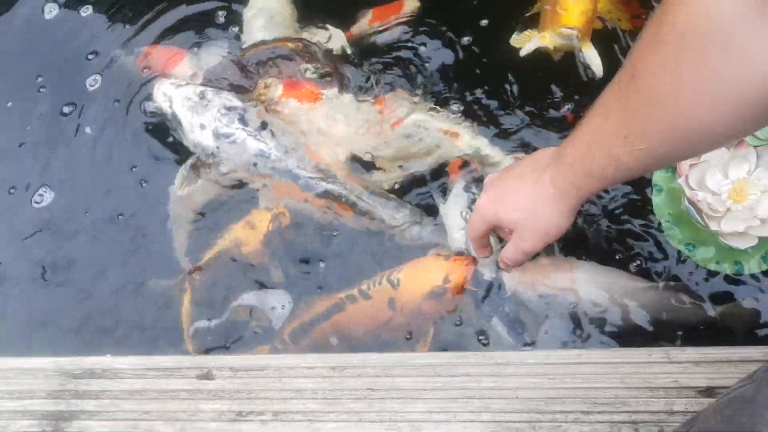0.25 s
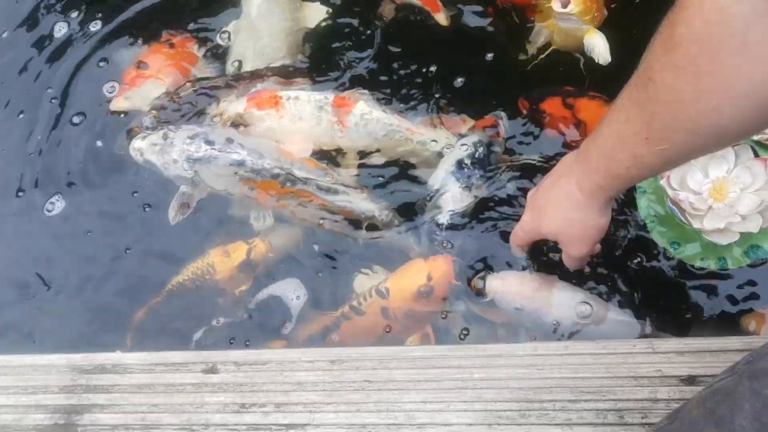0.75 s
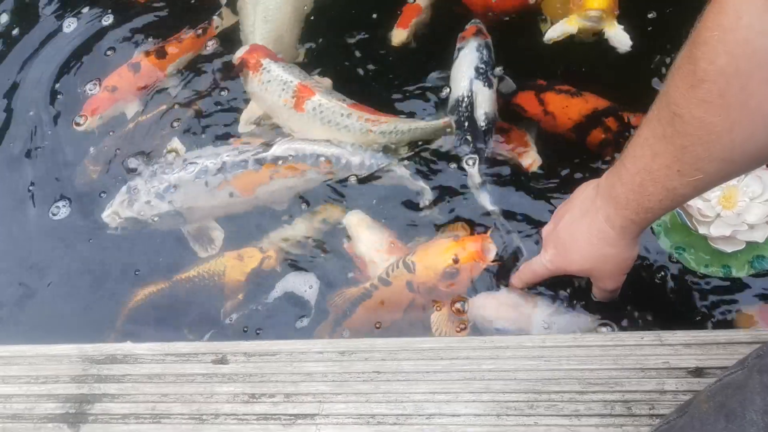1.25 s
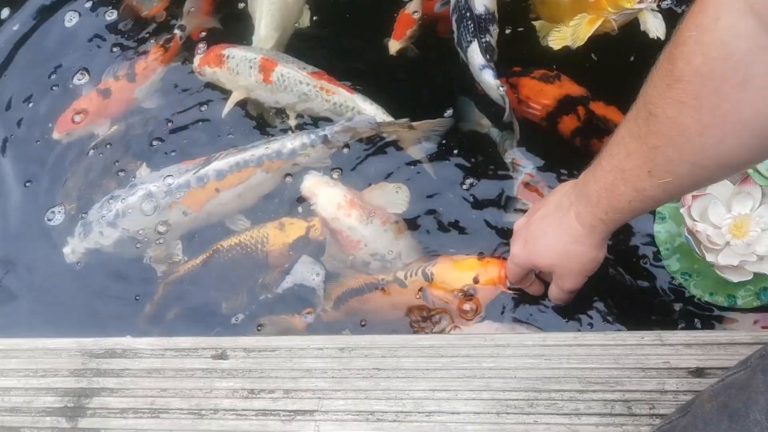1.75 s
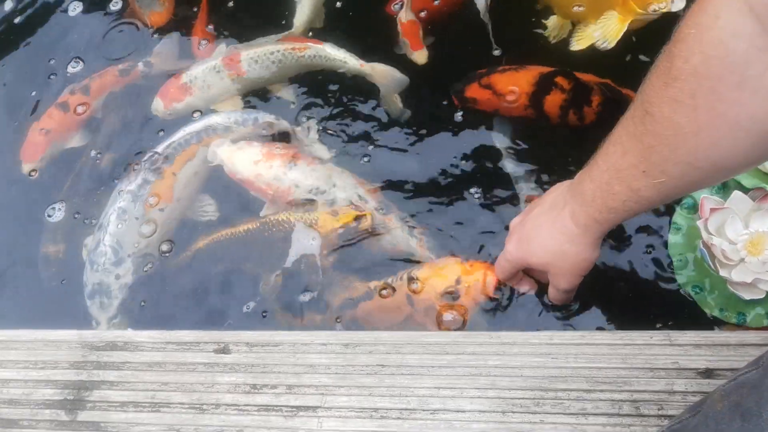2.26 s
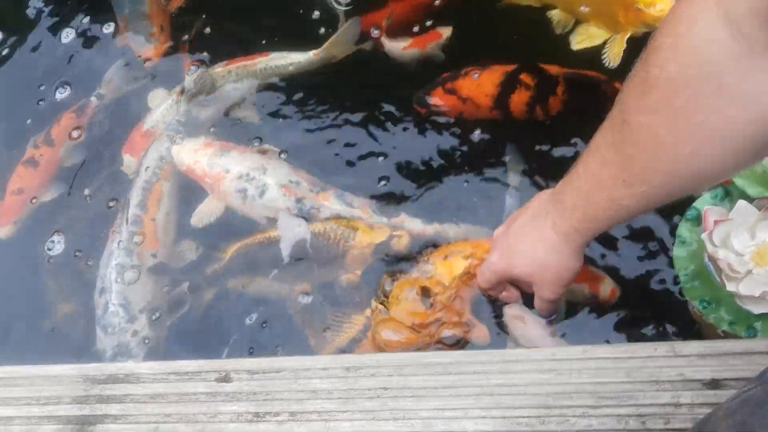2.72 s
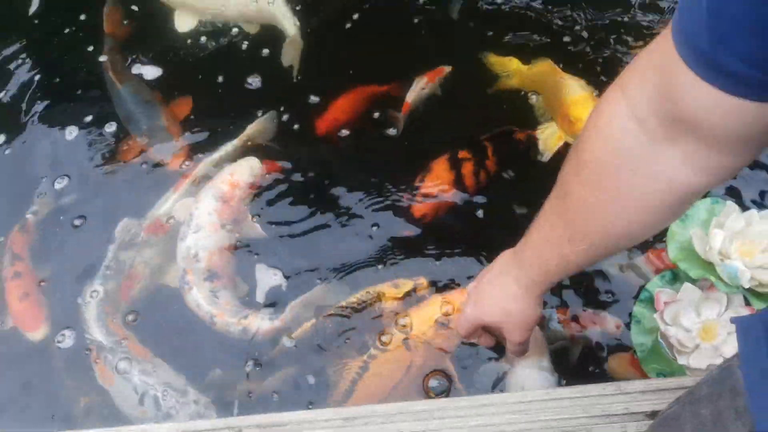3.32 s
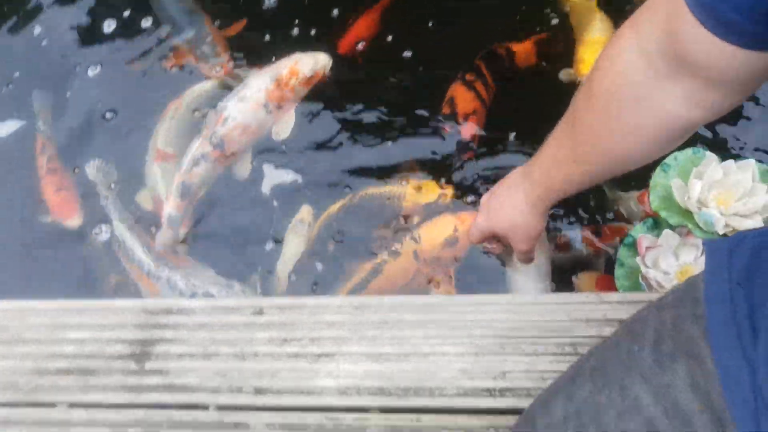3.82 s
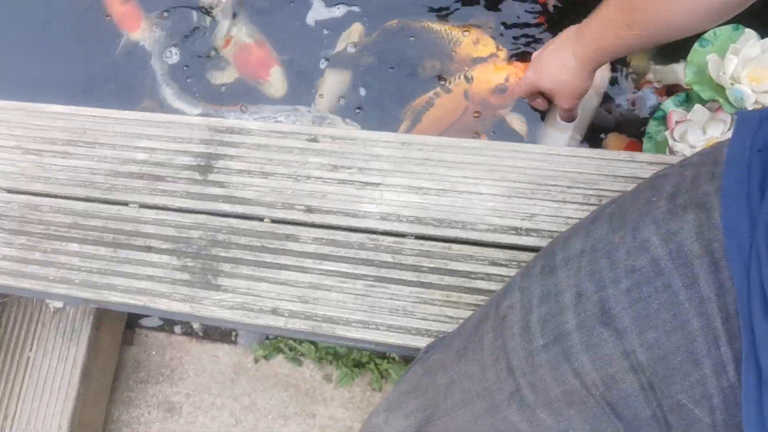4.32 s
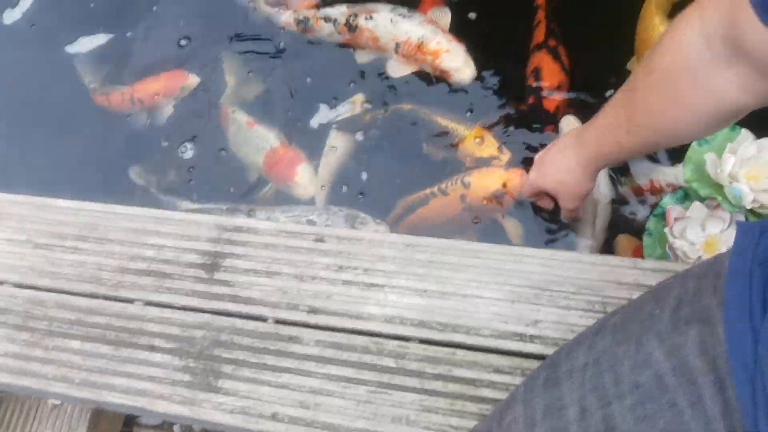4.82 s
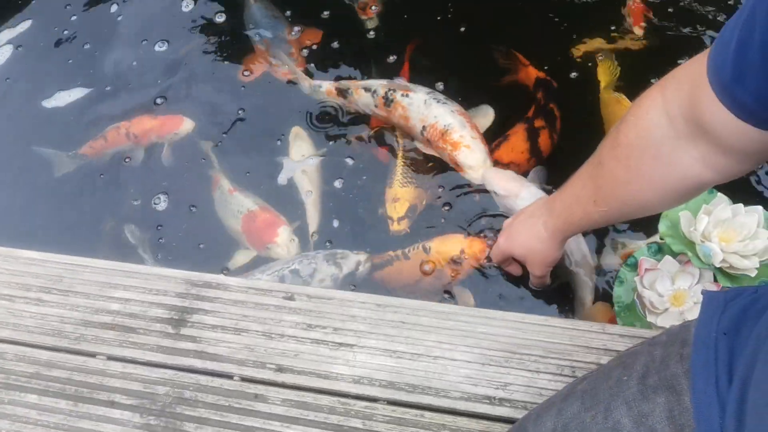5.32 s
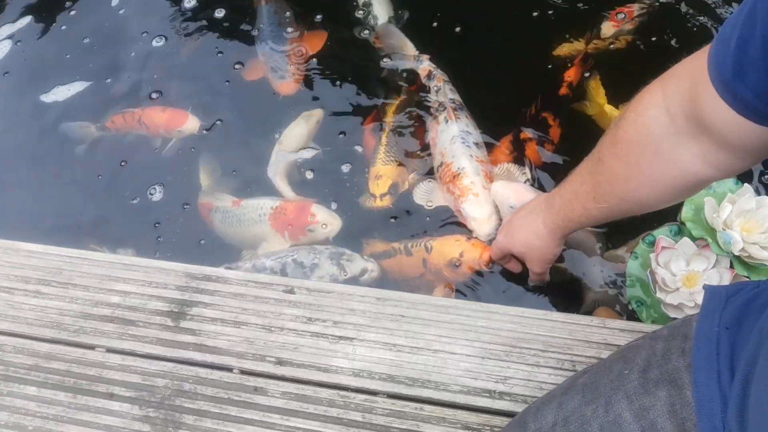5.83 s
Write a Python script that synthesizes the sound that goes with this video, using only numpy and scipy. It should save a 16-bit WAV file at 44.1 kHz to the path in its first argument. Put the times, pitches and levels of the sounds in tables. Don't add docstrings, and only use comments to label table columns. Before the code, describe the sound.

Outdoors at a garden pond, a handheld phone hears about six seconds of bright, dense trickling and spitting water, slowly easing. Beneath it are low rumble, a steady pump hum, a pitched drain gurgle and a distant propeller engine whose drone wavers and sags slightly. From the start, feeding fish make short wet lip smacks with crisp spray, mostly on the left; tiny rising bubble blips appear around 0.2, cluster at 1.7-1.8, and return at 3.6, 4.2, 5.05 and 5.85. Soft thumb thuds touch the case at 0.2-0.5, 0.9, 1.4 and 2.0. A faint vehicle whine falls in pitch at 1.3-2.2. At 2.7 skin gives a quick rising squeak, then the grip thumps, ticks and creaks until 4.1, strongest around 2.8-3.5 and on the right. Smacks grow frequent from 4.4 onward, with only faint pushes to the end.

```python
import sys
import numpy as np
from scipy import signal
from scipy.fft import rfft, irfft, next_fast_len
from scipy.io import wavfile
from scipy.ndimage import map_coordinates

SR = 44100
rng = np.random.default_rng(int(sys.argv[2]) if len(sys.argv) > 2 else 0)


def rack_gain(trim_db):
    fader = np.asarray(trim_db, float)
    return 10 ** (fader / 20)


def unload_wav(signal):
    wavfile.write(
        sys.argv[1],
        SR,
        np.round(np.clip(np.atleast_2d(signal).T, -1, 1) * 32767).astype(np.int16),
    )


N = 267687


def unit(x):
    return x / np.sqrt(np.mean(x ** 2) + 1e-20)


def along(f, v, hz):
    return np.interp(np.log(hz + 1), np.log(np.asarray(f) + 1), v)


def curves(rows):
    s, *cols = np.transpose(rows)
    return [np.interp(np.arange(N) / SR, s, c) for c in cols]


def wobble(rate_hz):
    knots = rng.standard_normal(int(N * rate_hz / SR) + 4)
    return map_coordinates(knots, [np.arange(N) * rate_hz / SR])


def filtered(x, response):
    m = next_fast_len(N + 8192)
    return irfft(rfft(x, m) * response(np.fft.rfftfreq(m, 1 / SR)), m)[..., :N]


def add(track, s, sound):
    i = max(round(s * SR), 0)
    track[..., i:i + sound.shape[-1]] += sound[..., :N - i]


def ring(hz, t60, attack, t, lead=0):
    shape = rack_gain(-60 * t / t60) * (1 - np.exp(-t / attack)) ** 2
    return np.sin(2 * np.pi * (hz * t + lead)) * shape / shape.max()


def swells(rows):
    t = np.arange(N) / SR
    return np.sqrt(sum(rack_gain(2 * db - 12 * ((t - s) / half_s) ** 2) for s, db, half_s in rows))


def pair(spectrum, alike):
    def gain(hz):
        turn = np.arccos(np.clip(along(*np.transpose(alike), hz), -1, 1)) / 2
        return rack_gain(along(*np.transpose(spectrum), hz)) * [np.cos(turn), np.sin(turn)]

    mid, side = filtered(rng.standard_normal((2, N)), gain)
    return unit(np.array([mid + side, mid - side]))


def droplets(count, size, low_hz, span, cycles, spread_db):
    draw = rng.random((count, 3))
    hz = low_hz * span ** draw[:, 1:2]
    turns = hz * np.arange(size) / SR
    level = rack_gain(-spread_db * np.log(1 - draw[:, 2:])) * np.sqrt(hz)
    shape = np.exp(-2 * turns / cycles) * (1 - np.exp(-turns / 0.54))
    grain = level * np.sin(2 * np.pi * turns * (1 + 0.054 * turns / cycles)) * shape
    at = (draw[:, :1] * N).astype(int) + np.arange(size)
    return unit(np.bincount(at.ravel(), grain.ravel(), N + size)[:N])


# time in seconds, pitch in Hz, level in dB.
PASSING = [
    (1.3, 410, -70.5),
    (1.5, 395, -64),
    (1.75, 368, -60),
    (1.95, 350, -65),
    (2.15, 342, -74),
]


def traffic():
    hz, db = curves(PASSING)
    falling = np.gradient(hz) < 0
    whine = rack_gain(db + 2.7 * wobble(11.8)) * falling * np.sin(2 * np.pi * np.cumsum(hz) / SR)
    return np.sqrt(2) * whine * rack_gain([[-1], [1.5]])


# frequency in Hz, level in dB per Hz.
AIR_SPECTRUM = [(12, -48), (20, -2), (38, -0.5), (70, -3.5), (106, -2), (229, -6.5), (273, -5), (393, -13),
                (604, -3.5), (805, -17), (900, -26), (1170, -31), (1980, -120)]
# frequency in Hz, left-right likeness as a fraction.
AIR_ALIKE = [(30, 1), (130, 0.83), (300, 0.32), (450, 0.83), (600, .8), (900, 0.15)]


def air():
    return rack_gain(-50.0 + 0.92 * wobble(31)) * pair(AIR_SPECTRUM, AIR_ALIKE)


MULTIPLES = [
    [2],
    [3],
    [4],
    [6],
]
# peak time in seconds, peak in dB, half length in seconds.
SWELLS = [
    [(0.4, -49.5, 0.42), (1.65, -42.5, 0.24), (2.05, -46.5, 0.3), (2.9, -43.5, 0.51), (4.2, -53.5, 0.45),
     (5.4, -69, 0.61)],
    [(0.7, -59.5, 0.45), (2.75, -54.5, .25), (3.8, -53, .2), (4.7, -48, 0.63), (5.7, -48.5, 0.34)],
    [(0, -57, 0.5), (0.9, -59, 0.15), (1.65, -57.5, 0.19), (2.95, -51, .3), (3.85, -49.5, .25),
     (4.5, -54, 0.64), (5.7, -45, 0.33)],
    [(2.3, -62, 0.27), (3, -60, 0.27), (3.85, -56.5, 0.14), (4.6, -58.5, 0.23), (5.75, -62.5, 0.3)],
]


def engine():
    firing_hz, sag_hz_per_s = 58, 0.42
    t = np.arange(N) / SR
    turns = (firing_hz - sag_hz_per_s * t / 2) * t + 0.0032 * wobble(4.92)
    unsteady_db = 2 * np.array([wobble(6) for _ in SWELLS])
    level = np.array([swells(rows) for rows in SWELLS]) * rack_gain(unsteady_db)
    drone = np.sqrt(2) * (level * np.sin(2 * np.pi * turns * MULTIPLES)).sum(0)
    return np.array([np.roll(drone, 6), drone]) * rack_gain([[-2.5], [1.8]])


# frequency in Hz, level in dB.
PUMP_TONES = [(41, -55), (100, -54)]


def pump():
    t = np.arange(N) / SR
    hum = np.zeros(N)
    for hz, db in PUMP_TONES:
        level = np.sqrt(2) * rack_gain(db + 3 * wobble(3))
        hum += level * np.sin(2 * np.pi * hz * t + 0.8 * wobble(3))
    return hum * rack_gain([[-1.5], [1.5]])


def drain():
    ebb_db_per_s = 0.73
    gurgle = droplets(count=1800, size=1500, low_hz=548.6, span=1.186, cycles=12, spread_db=1.8)
    gurgle = gurgle * rack_gain(-56.0 - ebb_db_per_s * np.arange(N) / SR)
    return np.array([rack_gain(2.0) * np.roll(gurgle, 5), rack_gain(-3.0) * gurgle])


# start in seconds, peak in dB, pitch in Hz.
BUBBLES = [(0.179, -41, 2890), (0.3694, -48, 4180), (1.6994, -41, 2460), (1.7878, -34, 3310),
           (1.775, -36, 2260), (1.8344, -51, 2200), (3.5897, -36.5, 3280), (4.1674, -38, 2100),
           (5.05, -40, 1980), (5.854, -31.5, 2250)]


def bubbles():
    out, t = np.zeros((2, N)), np.arange(SR // 20) / SR
    for (s, db, hz), luck in zip(BUBBLES, rng.random((len(BUBBLES), 5, 2))):
        for late, off in luck:
            pitch_hz = hz * (1.15 - 0.396 * off) * (1 + 2.8 * t)
            level = rack_gain(db - 2.0 - 7.5 * off) * rack_gain([[0], [-15]])
            add(out, s + 0.024 * late, level * ring(pitch_hz, 0.045, 0.00087, t))
    return out


def trickle_and_hiss():
    level_db, ebb_db_per_s = -43, 0.1833
    near = droplets(count=9000, size=160, low_hz=934, span=17.56, cycles=5.1, spread_db=1.5)
    glitter = droplets(count=9000, size=160, low_hz=872, span=24.1, cycles=7.5, spread_db=-1.5)
    trickle = droplets(count=2500, size=900, low_hz=1290, span=8, cycles=25.7, spread_db=1.0)
    flow = np.array([0.39 * near + 0.31 * trickle, 0.83 * glitter + 0.4 * trickle])
    flow = flow + rng.standard_normal((2, N))
    shared_db = level_db - ebb_db_per_s * np.arange(N) / SR + 0.65 * wobble(16)
    return flow * rack_gain(shared_db + np.array([0.5 * wobble(40), 0.83 * wobble(24)]))


# start in seconds, level in the left port's whistle in dB, spray in dB.
SUCKS = [(0.105, -43, -44), (0.3214, -28, -39), (0.5277, -29, -43), (0.9294, -31, -47), (1.41, -17.5, -50),
         (1.4154, -18, -49), (1.4214, -34, -51), (1.6422, -23, -41.5), (2.29, -24, -48),
         (2.5215, -21.5, -48), (2.6294, -31, -40.5), (2.7644, -26.5, -38.5), (3.746, -28, -44),
         (4.1094, -39, -42), (4.3664, -28, -47), (4.4523, -21, -51), (4.469, -17, -41), (4.563, -24, -48),
         (4.682, -23, -50), (4.7694, -29, -52), (5.1412, -22, -46), (5.1957, -26, -40), (5.3415, -20, -43),
         (5.6186, -23.5, -44), (5.6655, -25, -47), (5.7133, -42, -41), (5.8691, -26, -47)]


def lip_smacks():
    t = np.arange(SR // 40) / SR
    smack, spray = np.zeros((2, N))
    smack, spray = np.zeros((2, N)), np.zeros((2, N))
    puffs = rng.standard_normal((len(SUCKS), 2, len(t)))
    for (s, db, spray_db), puff in zip(SUCKS, puffs):
        add(smack, s, rack_gain(db - 4.5 - 60 * t / 0.022) * puff * (1 - np.exp(-t / 0.0005)))
        add(spray, s, rack_gain(spray_db + 5 - 60 * t / 0.074) * puff)
    smack = filtered(smack, lambda hz: 1 / (1 + (hz / 6000) ** 8) / (1 + (3300 / (hz + 1)) ** 4))
    return smack + filtered(spray, lambda hz: 1 / (1 + (6500 / (hz + 1)) ** 6))


# frequency in Hz, left in dB per Hz, right in dB per Hz.
PORTS = [(400, -6, -23), (1370, -9.5, -20.5), (2200, -4, -22.5), (3690, -7.5, -25.5), (4440, -0.5, -28.5),
         (5204, 8, -31), (6100, -9, -30), (6950, -12.5, -30.5), (7550, -26.5, -23.5), (8580, -13.5, -24),
         (8980, -14, -10.5), (10860, 1.5, -6.5), (11770, -10, -10), (14000, -16.5, -21), (15500, -11, -26)]


def water():
    f, left_db, right_db = np.transpose(PORTS)

    def ports(hz):
        edge = 1 / (1 + (350 / (hz + 1)) ** 4)
        return edge * rack_gain([along(f, left_db, hz), along(f, right_db, hz)])

    return rack_gain(11) * filtered(trickle_and_hiss() + lip_smacks(), ports)


# peak time in seconds, peak in dB, half length in seconds.
LEANS = [(0.24, -36, 0.059), (0.5, -45, 0.039), (0.69, -47.5, 0.15), (0.93, -38, 0.043), (1.3, -40, 0.012),
         (1.42, -36, 0.022), (1.6, -48, 0.065), (2.01, -43, 0.029), (2.5, -36.5, 0.082),
         (2.64, -33.5, 0.05), (2.83, -31, .07), (2.96, -23, 0.065), (3.1, -30, .04), (3.2, -24.5, 0.019),
         (3.35, -39, 0.063), (3.52, -37, 0.015), (4.07, -42.5, 0.056), (4.24, -50, 0.036)]
# frequency in Hz, level in dB per Hz.
HEAVE_COLOUR = [(8, -11), (20, 11), (40, 5), (80, -4), (150, -20.5), (300, -51)]


def heave():
    rest_db, settle_db_per_s = -49, 1.25
    rest = rack_gain(rest_db - settle_db_per_s * np.arange(N) / SR + 1.24 * wobble(6.9))
    rumble = pair(HEAVE_COLOUR, [(30, 0.9), (100, 0.32)])
    return (rest + swells(LEANS)) * rumble * rack_gain([[-2.5], [2.1]])


# time in seconds, pitch in Hz, level in dB.
SQUEAK = [
    (2.70, 293, -61),
    (2.715, 336, -39.5),
    (2.74, 466, -38.5),
    (2.761, 647, -43),
    (2.775, 680, -58),
]


def squeak():
    hz, db = curves(SQUEAK)
    rising = np.gradient(hz) > 0
    tone = rack_gain(db - 1.0 + 3.2 * wobble(200)) * rising * np.sin(2 * np.pi * np.cumsum(hz) / SR)
    return tone * rack_gain([[3], [2.5]])


# start in seconds, thud in dB, thud pitch in Hz.
PUSHES = [(0.2166, -18.5, 160), (0.4575, -27.5, 186), (1.4107, -26.5, 125), (1.991, -20, 259),
          (2.427, -30, 145), (2.457, -30.5, 174), (2.487, -27.5, 143), (3.0797, -9.5, 188),
          (3.2041, -6.5, 164), (5.009, -36, 162.5), (5.66, -35, 225), (5.7, -40, 225.4), (5.769, -39, 221)]
# start in seconds, thud in dB, thud pitch in Hz.
LETGOES = [(0.1555, -27.5, 190), (0.2496, -29.5, 162), (0.503, -32, 157), (0.917, -19, 242),
           (0.9369, -29, 240), (2.779, -18, 244), (2.796, -13.5, 258), (2.8394, -11.5, 249),
           (2.8668, -11.5, 232), (2.8919, -11.5, 252), (2.9554, -19.5, 155), (3.094, -26, 235),
           (3.199, -19, 275), (3.2227, -20, 151)]
# first slip in seconds, last slip in seconds, first ring in dB, last in dB.
CREAKS = [
    (2.8957, 2.9196, -24.5, -29),
    (2.9341, 2.9494, -23, -20.5),
    (3.1415, 3.185, -43.5, -33.5),
    (3.233, 3.2998, -31.5, -23),
    (3.3446, 3.3886, -22.5, -18.5),
    (3.4868, 3.5013, -14, -26),
    (3.754, 3.8729, -29.5, -37.5),
    (4.029, 4.0499, -34.5, -26),
    (4.0693, 4.0896, -26, -26.5),
]
SLIP_COUNTS = [4, 2, 5, 7, 3, 2, 3, 2, 3]
CREAK_WAYS = [1, 1, -1, -1, -1, -1, -1, -1, -1]
# time in seconds, ring in dB.
UNEVEN = [.0005, 1.5]
# start in seconds, ring in dB.
TICKS = [(0.917, -31), (1.991, -35.5), (2.8578, -26), (2.8837, -22.5), (3.2041, -24.5), (4.9082, -31.5),
         (5.3787, -40)]


def moves():
    push_ring_db, faintest_ring_db = -30, -66
    mid_ring_db, slip_thud_db, tick_thud_db = -28, -19, -8
    thud_db_per_ring_db, slip_hz, hz_per_ring_db = 0.55, 255, 3.5
    rows = []
    for touches, way in ((PUSHES, 1), (LETGOES, -1)):
        for s, db, hz in touches:
            rows.append((s, db, hz, max(db + push_ring_db, faintest_ring_db), way))
    slips = [(s, db, tick_thud_db, -1) for s, db in TICKS]
    for (first, last, first_db, last_db), n, way in zip(CREAKS, SLIP_COUNTS, CREAK_WAYS):
        even = np.linspace([first, first_db], [last, last_db], n)
        for s, db in even + rng.standard_normal((n, 2)) * UNEVEN:
            slips.append((s, db, tick_thud_db * (way > 0), way))
    for s, db, less_db, way in slips:
        sharper_db = db - mid_ring_db
        thud_db = slip_thud_db + less_db + thud_db_per_ring_db * min(sharper_db, 6)
        rows.append((s, thud_db, slip_hz + hz_per_ring_db * sharper_db, db, way))
    return rows


# frequency in Hz, right in dB, left in dB, t60 in seconds.
SHELL = [(542, -1.5, -12.5, 0.013), (688, -24, -6, 0.016), (854, 0, -23, 0.015), (950, -13, -22, .017),
         (1334, -13.5, -14, 0.014), (2120, -11, -26, .01), (2600, -12.5, -26, 0.0064),
         (3580, -8, -24, 0.0025)]


def grip():
    out, t = np.zeros((2, N)), np.arange(SR // 25) / SR
    rows = moves()
    for (s, db, hz, ring_db, way), luck in zip(rows, rng.standard_normal((len(rows), len(SHELL)))):
        sharp = ring_db > db - 20
        left_db = np.interp(hz, [170, 230], [-12, -6])
        soft_cycles = np.interp(hz, [190, 230], [0.45, 0.2 if sharp else 0.32])
        t60 = np.interp(hz, [190, 230], [2.4, 3.5 if sharp else 4]) / hz
        right_thud = ring(hz, t60, soft_cycles / hz, t, lead=0.04)
        left_thud = ring(1.08 * hz, t60, 0.6 / hz, t, lead=0.2)
        add(out[1], s - 0.28 / hz, way * rack_gain(db + 2.5) * right_thud)
        add(out[0], s + 0.05 / hz, way * rack_gain(db + left_db + 2.5) * left_thud)
        bright_db_per_octave = max(0.3 * (ring_db + 19), -2)
        for (f, right_db, left_db, mode_t60), g in zip(SHELL, luck):
            mode_db = ring_db + 0.5 + bright_db_per_octave * np.log2(f / 860) + 1.5 * g
            mode = way * rack_gain(mode_db) * ring(f, mode_t60, min(0.7 / f, 700 / f ** 2), t)
            add(out[1], s - 0.0006, rack_gain(right_db) * mode)
            add(out[0], s + 0.0002, rack_gain(left_db) * mode)
    return out


def scene():
    background = traffic() + air() + engine() + pump()
    pond = drain() + bubbles() + water()
    hand = heave() + squeak() + grip()
    return background + pond + hand


def top_cut(x):
    return signal.sosfilt(signal.butter(12, 15830, fs=SR, output="sos"), x)


def record(dry):
    mix = filtered(dry, lambda hz: hz < 15750)
    return top_cut(mix)


dry = scene()
out = record(dry)
unload_wav(out)
```